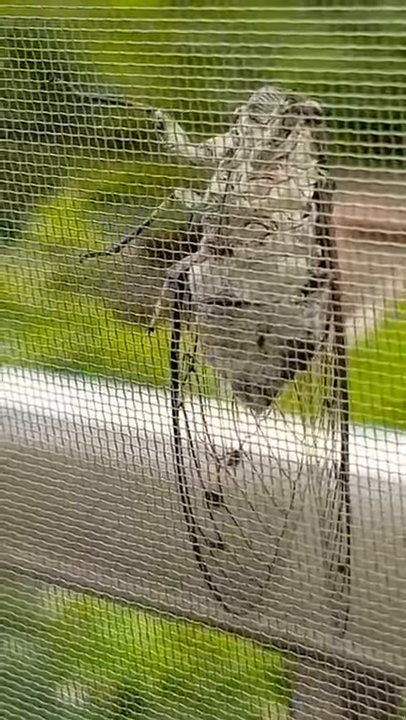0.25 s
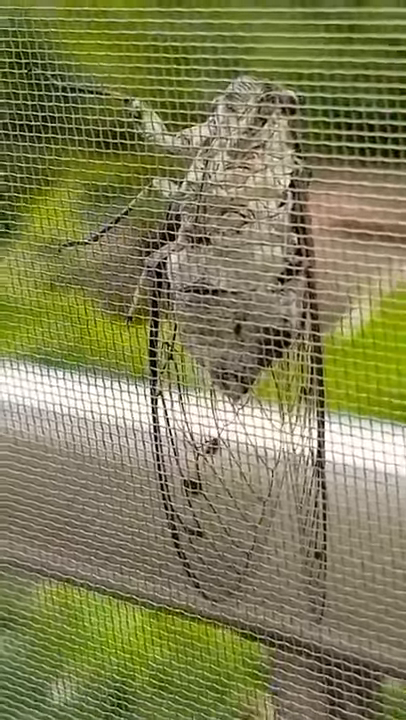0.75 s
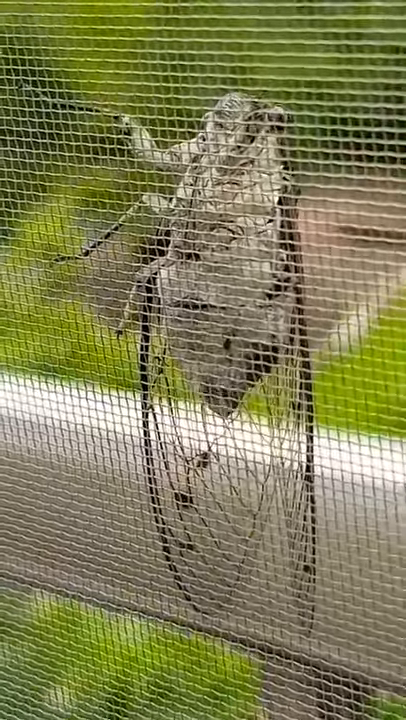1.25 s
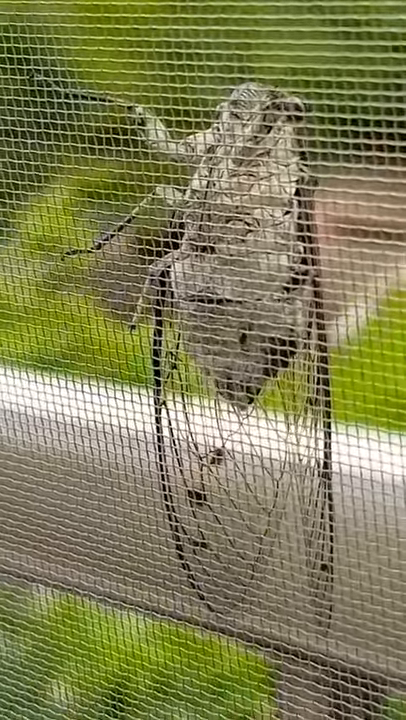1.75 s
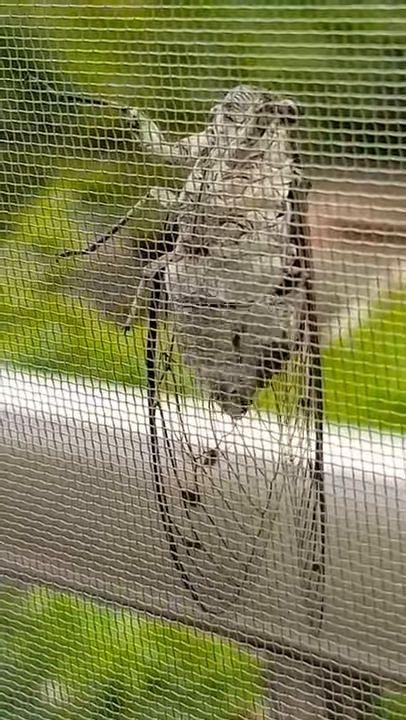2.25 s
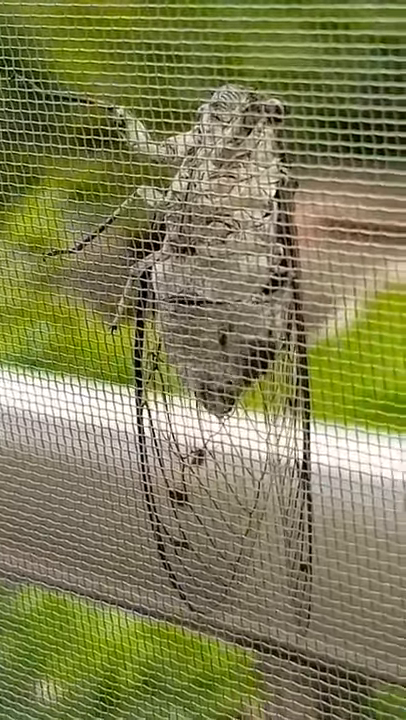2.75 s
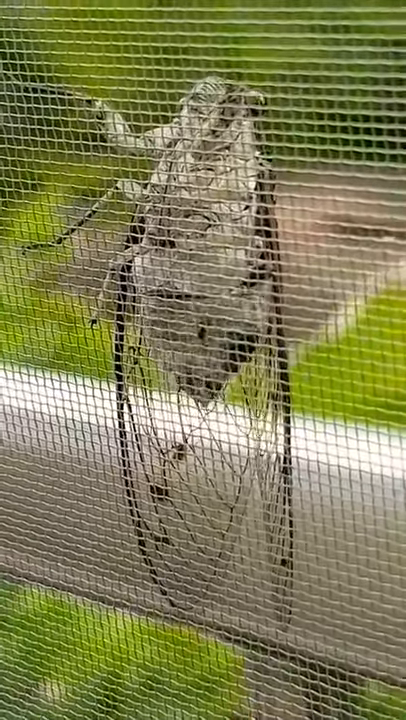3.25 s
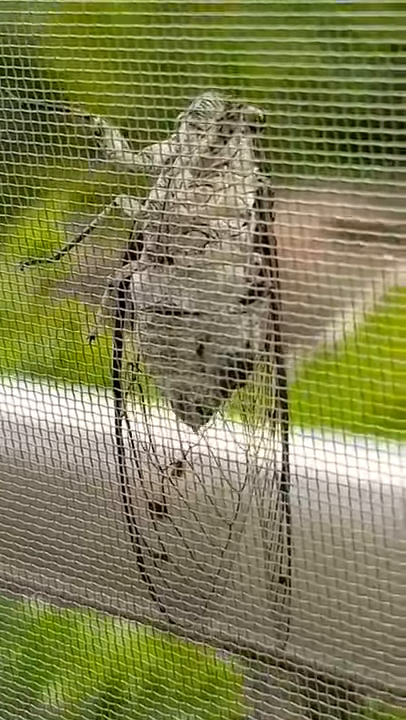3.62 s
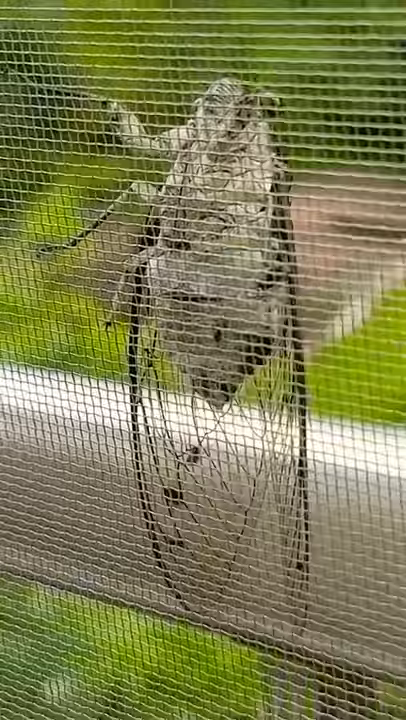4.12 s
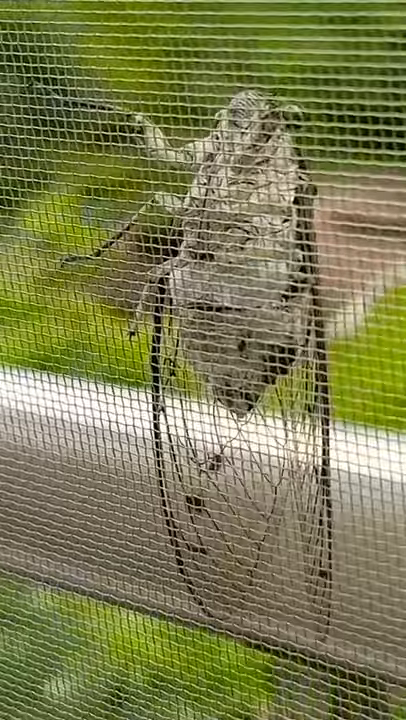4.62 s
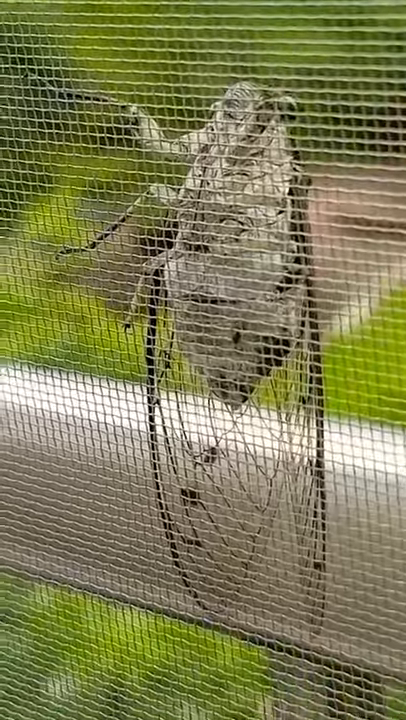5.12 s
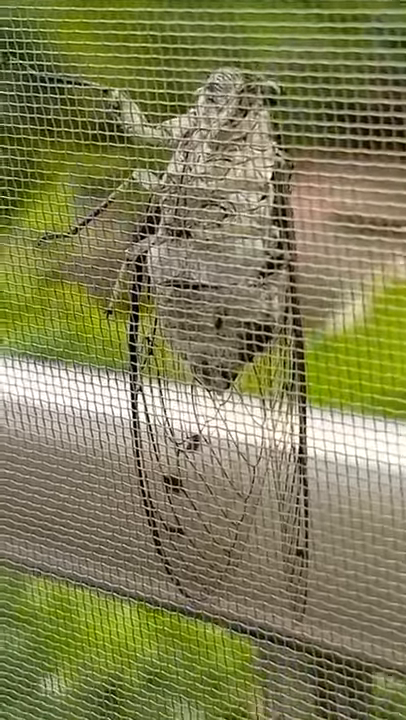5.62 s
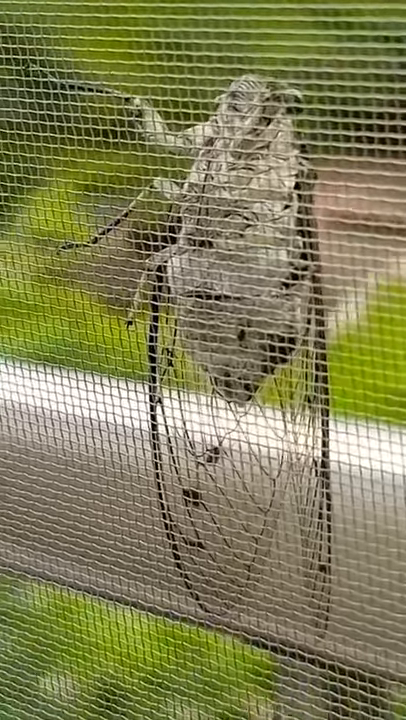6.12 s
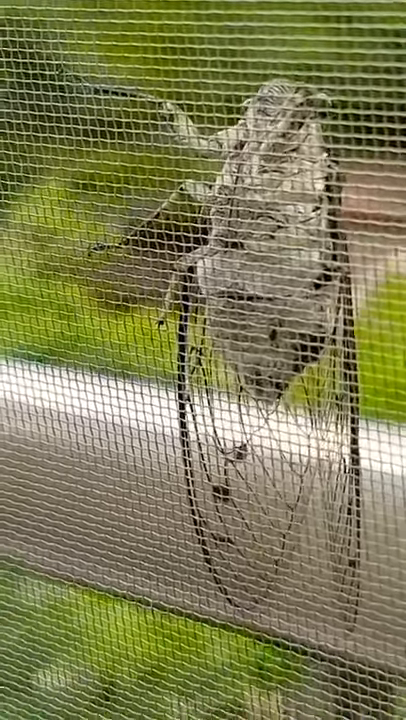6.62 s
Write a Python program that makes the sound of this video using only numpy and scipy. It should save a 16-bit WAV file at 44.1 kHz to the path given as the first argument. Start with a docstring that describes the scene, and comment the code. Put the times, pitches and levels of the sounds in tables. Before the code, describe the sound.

A cicada buzzes loudly up close outdoors, its song dipping to a high sizzle several times, then stops dead, leaving faint hiss and rumble.

```python
"""At a window screen, a cicada sings a hand's width from the microphone, then stops dead.
Its two tymbals (ribbed drum skins) buckle in turn and spring back: four clicks a cycle, which ring
in its body. Four times its abdomen (belly) slackens, the ring sinks, and the song thins to a high
sizzle, then snaps back. Brief pips flicker through the buzz. At last the beat runs down. Behind it
are an outdoor rumble, a far engine, the hiss of far insects and, near the end, three faint chirps."""
import sys
import numpy as np
from scipy import signal
from scipy.fft import rfft, irfft
from scipy.io import wavfile
from scipy.ndimage import uniform_filter1d

SR = 44100
rng = np.random.default_rng(int(sys.argv[2]) if len(sys.argv) > 2 else 0)


def int16_out(signal):
    """Quantize to a 16-bit WAV file."""
    q = np.round(np.clip(np.atleast_2d(signal).T, -1, 1) * 32767)
    wavfile.write(sys.argv[1], SR, q.astype(np.int16))


N = 302967

# One row for each pull of the abdomen: it snaps taut, eases its grip, then lets go.
# Columns: snap_s, ease_s, let_go_s, level_db, gripped_ring_hz, burst_db, burst_width_s
PHRASES = [(0.075, 0.258, 1.17, -24, 4730, -31, 0.038), (1.515, 1.84, 1.99, -25, 4660, -31.5, 0.023),
           (2.28, 2.504, 2.68, -24, 4630, -30.5, 0.027), (2.999, 3.237, 3.345, -23.5, 4640, -28.5, 0.02),
           (3.675, 3.92, 5.1, -24.5, 4650, -31.5, 0.028)]
# How hard the tymbals' ribs are driven. Columns: time_s, level_db
EFFORT = [(0, -5), (.3, -6), (1.3, -2), (3.1, 0), (5.0, -0.5)]

STOP_S = 5.031  # the song ends
PULL_S, SLACKEN_S, SIZZLE_ON_S = 0.05, 0.26, 0.045  # time to go taut, go slack, start sizzling
SLACK_HZ, HELD_HZ = 3650, 4420  # where the abdomen rings when slack and when held taut


def gain_of(db):
    """Turns decibels into a number to multiply by."""
    return 10 ** (np.asarray(db) / 20)


def evened(x):
    """Scales a signal to an average strength (rms) of 1."""
    return x / np.sqrt(np.mean(x ** 2) + 1e-20)


def ramp(x):
    """0 before, 1 after, a straight line between."""
    return np.clip(x, 0, 1)


def bump(t, width_s):
    """A smooth swell of height 1 around t = 0."""
    return np.exp(-.5 * (t / width_s) ** 2)


def read(points, hz):
    """Looks up a table by pitch, with every octave equally wide."""
    pitch_hz, value = np.transpose(points)
    return np.interp(np.log(hz + 1), np.log(pitch_hz + 1), value)


def follow(table, t):
    """Looks up every column of a table at the times t."""
    time_s, *columns = np.transpose(table)
    return [np.interp(t, time_s, column) for column in columns]


def causal(db):
    """The spectrum of the shortest ring that has these levels and starts only when struck."""
    cepstrum = irfft(db * np.log(10) / 20)
    half = cepstrum.shape[-1] // 2
    cepstrum[..., 1:half] *= 2
    cepstrum[..., half + 1:] = 0
    return np.exp(rfft(cepstrum))


def colour(x, points, size=2048):
    """Makes each pitch louder or softer, as a table of pitch_hz, level_db says."""
    taps = irfft(causal(read(points, np.fft.rfftfreq(size, 1 / SR))))
    return signal.oaconvolve(x, taps)[:N]


def resonate(x, hz, width_hz, passes=1):
    """Makes x ring at a pitch that may move: shifts that pitch to zero, smooths, shifts back."""
    turn = np.exp(2j * np.pi * np.cumsum(np.full(N, hz)) / SR)
    fade = np.exp(-np.pi * width_hz / SR)
    for _ in range(passes):
        x = 2 * (turn * signal.lfilter([1 - fade], [1, -fade], x / turn + 1e-18)).real
    return x


def wander(fastest_hz, span=20):
    """A random drift of strength 1; its slowest wave is span times slower than its fastest."""
    t = np.linspace(0, N / SR, N // 64)
    rates_hz = np.geomspace(fastest_hz / span, fastest_hz, 24)
    drift = sum(np.sin(2 * np.pi * (hz * t + rng.random())) for hz in rates_hz)
    return np.interp(np.arange(N) / SR, t, evened(drift))


def outdoor_rumble(level_db=-43, swell_db=1.41):
    """Far rumble that swells gently; its bass is alike on the left and right."""
    # Tone of the rumble. Columns: pitch_hz, relative_db
    rumble_tone = [(15, -45), (25, -23), (48, -1.5), (129, -0.5), (193, -1), (331, -11), (378, -8),
                   (666, -13), (895, -12), (1170, -13), (2300, -28), (3530, -74), (4750, -65), (5580, -48),
                   (15500, -53)]
    # How alike the two sides are. Columns: pitch_hz, likeness (1 = same; below 0 counts as 0)
    likeness = [(60, 0.99), (130, 1), (290, 0.91), (640, 0.69), (1410, 0.18), (3100, -0.53), (6820, -0.082),
                (15000, 0.31)]
    hz = np.fft.rfftfreq(N, 1 / SR)
    left, other = rfft(rng.standard_normal((2, N)))
    shared = np.sqrt(np.clip(read(likeness, hz), 0, 1))
    right = shared * left + np.sqrt(1 - shared ** 2) * other
    rumble = irfft(np.array([left, right]) * gain_of(read(rumble_tone, hz)), N)
    return evened(rumble) * gain_of(level_db + swell_db * wander(11))


def far_insects(level_db=-55, swell_db=1.41):
    """A chorus of far insects blurs into a soft hiss."""
    # Tone of the chorus. Columns: pitch_hz, relative_db
    chorus_tone = [(2200, -7.5), (3000, -1), (3500, -2), (3880, 1.5), (4150, -4), (4550, 1.5),
                   (5300, -10.5), (7000, -14.5)]
    hiss = np.array([evened(colour(noise, chorus_tone)) for noise in rng.standard_normal((2, N))])
    return hiss * gain_of(level_db + swell_db * wander(5.2))


def engine(waver=0.014, flutter_db=3):
    """A few low tones sink in pitch as a far vehicle passes; the air makes them flutter."""
    # The engine going by. Columns: time_s, pitch_hz, level_db
    passing = [(0, 200.4, -64), (1.2, 191.3, -54.5), (2, 183.7, -56), (2.7, 178.4, -43), (3.3, 169.4, -50),
               (4, 163.3, -54.5), (5.5, 161, -57)]
    # Its tones. Columns: pitch_multiple, relative_db
    tones = [(1, 3.5), (1.17, -2), (1.48, -1), (2, -2)]
    pitch_hz, level_db = follow(passing, np.arange(N) / SR)
    cycles = np.cumsum(pitch_hz * (1 + waver * wander(20))) / SR
    hum = sum(gain_of(db + flutter_db * wander(14)) * np.sin(2 * np.pi * multiple * cycles)
              for multiple, db in tones)
    return gain_of(level_db) * evened(hum)


def tension(t, release_s=SLACKEN_S):
    """0 when the abdomen is slack, 1 when it is taut: a quick pull, a hold, a release."""
    return ramp(sum(ramp((t - snap) / PULL_S + .5) * (1 - ramp((t - let_go) / release_s))
                    for snap, _, let_go, *_ in PHRASES))


def grip(t, easing_s=.12):
    """1 from each snap until the abdomen eases its hardest pull, otherwise 0."""
    return sum(ramp((t - snap) / PULL_S + .5) * ramp((ease - t) / easing_s + .5)
               for snap, ease, *_ in PHRASES)


def near_snaps(t, width_s, early_s=0):
    """A swell at every snap of the abdomen, or early_s ahead of it."""
    return sum(bump(t - snap + early_s, width_s) for snap, *_ in PHRASES)


def shiver():
    """The abdomen's uneven trembling, 6 to 24 times a second."""
    return wander(24, span=4)


def phrase(t, slack_drop_db=7, surge_db=2):
    """The voice's level and the pitch the abdomen rings at: both rise as it tightens."""
    rows = np.array(PHRASES)
    current = np.maximum(np.searchsorted(rows[:, 0] - PULL_S, t) - 1, 0)
    _, _, _, phrase_db, gripped_hz, _, _ = rows[current].T
    taut = tension(t)
    level_db = phrase_db - slack_drop_db * (1 - taut) + surge_db * near_snaps(t, width_s=0.024)
    ring_hz = SLACK_HZ + taut * (HELD_HZ - SLACK_HZ) + grip(t) * (gripped_hz - HELD_HZ)
    return level_db, ring_hz


def clicks(waver=0.004, uneven_db=0.4, second_db=1.0, jitter_s=48e-6, spring_jitter_s=16e-6):
    """Muscles buckle the tymbals in turn. Gives each click's time, size and back (1 = springs back)."""
    # Pace of the muscles. Columns: time_s, cycles_per_s
    pace = [(0.0, 124.0), (0.4, 117.8), (1.15, 129.5), (1.28, 123.2), (1.6, 129.2), (1.97, 123.2),
            (2.04, 120.2), (2.62, 129.8), (2.76, 119.0), (3.05, 129.8), (3.38, 125.8), (3.47, 114.2),
            (4.2, 113.8), (4.45, 106.8), (4.68, 87.8), (4.94, 84.0), (5.03, 78.2)]
    # Timing within a cycle. Columns: time_s, spring_back_s, second_tymbal_lag_cycles
    timing = [(1.3, .003, .515), (3.3, .00285, .52), (3.8, .00278, .565), (4.4, .00274, .565),
              (5, .00256, .54)]
    t = np.arange(N) / SR
    cycles = np.cumsum(follow(pace, t)[0] * (1 + waver * wander(30))) / SR
    cycle = np.arange(int(cycles[-1]))
    first_s = np.interp(cycle, cycles, t)
    spring_s, lag = follow(timing, first_s)
    second_s = np.interp(cycle + lag, cycles, t)
    click_s = np.stack([first_s, first_s + spring_s, second_s, second_s + spring_s], 1).ravel()
    stroke, back = np.divmod(np.arange(len(click_s)), 2)
    late, spring_late, strength = rng.standard_normal((len(click_s), 3)).T
    slip_s = jitter_s * (2 - tension(click_s)) * late[stroke]  # twice as uneven when slack
    click_s = abs(click_s + slip_s + spring_jitter_s * spring_late * back)
    size = gain_of(uneven_db * strength + second_db * (stroke % 2))
    sung = click_s < STOP_S
    return click_s[sung], size[sung], back[sung]


def tymbals(click_s, size, back, taut_back_db=-2, bright_db=4, vary_db=2.0, sharp=0.83, samples=512):
    """Each click is a short ring. Springing back is flipped, brighter and, when taut, weaker."""
    # Tone of one click. Columns: pitch_hz, relative_db
    click_tone = [(200, -46), (1400, -28.5), (1880, -14.5), (2060, -33.5), (2250, -8.5), (2500, -7.5),
                  (2850, 0), (3450, 1), (4000, -2), (4700, 1), (5600, -5.5), (6200, -4.5), (7500, 0),
                  (8600, -9), (14000, -13)]
    hz = np.fft.rfftfreq(samples, 1 / SR)
    back_db = taut_back_db * tension(click_s)[:, None] + bright_db * ramp(np.log2((hz + 1) / HELD_HZ))
    db = read(click_tone, hz) + abdomen(click_s, hz) + back[:, None] * back_db
    db += vary_db * evened(uniform_filter1d(rng.standard_normal(db.shape), size=9, axis=1))
    # The ribs give way one after another, which softens the start a little.
    spectra = causal(sharp * db) * gain_of((1 - sharp) * db)
    whole, fraction = np.divmod(click_s * SR, 1)
    lead = samples // 2
    delay = np.exp(-2j * np.pi * hz / SR * (fraction[:, None] + lead))
    rings = (size * (1 - 2 * back))[:, None] * irfft(spectra * delay)
    places = whole.astype(int)[:, None] + np.arange(samples)
    return np.bincount(places.ravel(), rings.ravel(), N + lead)[lead:]


def abdomen(click_s, hz, width_hz=300, warble_hz=70, throb_db=1.7, calm=.4):
    """The trembling abdomen boosts each click near its own pitch and cuts what lies above, in dB."""
    taut, firm = tension(click_s), grip(click_s)
    tremble = calm * taut + (1 - calm) * firm  # calmer once the grip eases
    warble, throb = (tremble * shiver()[(click_s * SR).astype(int)] for _ in range(2))
    centre_hz = phrase(click_s)[1] + warble_hz * warble
    offset_hz = hz - centre_hz[:, None]
    boost_db = 4 + 2 * taut + 2 * firm + throb_db * throb
    cut_db = 11 + 4 * taut
    hump = 1 / (1 + (offset_hz / width_hz) ** 2)
    above = .5 + .5 * np.tanh((offset_hz - 260) / 180)
    return hump * boost_db[:, None] - above * cut_db[:, None]


def body(x, sway, taut_db=-4.32, slack_change_db=-8, sway_hz=22):
    """The body rings on from click to click, less when slack; its pitches waver as it sways."""
    # The body's narrow rings. Columns: pitch_hz, width_hz, relative_db, last_phrase_change_db
    rings = [(2280, 90, 2, 3), (2840, 100, 3, -6), (3080, 90, 9.5, 1), (3400, 120, -8, 1),
             (3800, 250, -10, 3), (4430, 220, -13, 3)]
    t = np.arange(N) / SR
    drive = x * gain_of(taut_db + slack_change_db * (1 - tension(t)))
    last_phrase = ramp((t - PHRASES[-1][0]) / PULL_S)
    return x + sum(gain_of(db + change_db * last_phrase) * resonate(drive, hz + sway_hz * sway, width)
                   for hz, width, db, change_db in rings)


def voice(click_s, size, back, sway, trim_db=-1, taut_trim_db=-2):
    """The cicada's main voice: tymbal clicks ringing in the body."""
    t = np.arange(N) / SR
    buzz = body(tymbals(click_s, size, back), sway) * gain_of(taut_trim_db * tension(t))
    return evened(buzz) * gain_of(phrase(t)[0] + trim_db)


def ribs(click_s, size, decay_s, steady, rise_s=0.0012):
    """The ribs crackle at each click, over steady rubbing; left and right get their own noise."""
    kicks = np.bincount((click_s * SR).astype(int), size, N)
    t = np.arange(-500, 501) / SR
    swell = np.exp(np.minimum(t / rise_s, -t / decay_s))
    bursts = evened(signal.oaconvolve(kicks, swell, "same"))
    rubbing = steady * (np.arange(N) / SR < STOP_S)
    return (bursts + rubbing) * rng.standard_normal((2, N))


def rasp(click_s, size, back, base_db=-32.25, slack_db=1.25, grip_db=-2, buckle_db=-5):
    """A broad crackle of the ribs, mostly on springing back, with a harsh burst at each snap."""
    # Tone of the rasp. Columns: pitch_hz, relative_db
    rasp_tone = [(1500, -22.5), (2500, 7.5), (5000, -4), (6500, 3), (7500, -1.5), (8800, -1.5),
                 (10300, 3.5), (11200, 2.5), (12000, -7), (13800, -5), (15800, 0.5)]
    # Tone of the burst. Columns: pitch_hz, relative_db
    burst_tone = [(1200, -17), (1900, -4), (2600, 10.5), (3500, 5), (5300, -2.5), (6600, 7.5), (7600, -19),
                  (11000, 3), (15000, -5)]
    t = np.arange(N) / SR
    crackle = ribs(click_s, size * gain_of(buckle_db * (1 - back)), decay_s=0.00086, steady=0.31)
    burst = sum(gain_of(db) * bump(t - snap, width_s) for snap, *_, db, width_s in PHRASES)
    level = gain_of(base_db + follow(EFFORT, t)[0] + slack_db * (1 - tension(t)) + grip_db * grip(t))
    return np.array([level * evened(colour(side, rasp_tone)) + burst * evened(colour(side, burst_tone))
                     for side in crackle])


def sizzle(click_s, size, back, slack_hz=13250, taut_hz=13600, sag_hz=700, flutter_db=1.0):
    """The ribs' own high ring, set off by buckling; it is lower when slack and sags at each snap."""
    # Tone of the crackle that feeds the ring. Columns: pitch_hz, relative_db
    sizzle_tone = [(6000, -7), (10000, -14), (11700, -4.5), (12500, 0), (13300, -2), (14500, 1),
                   (15800, -5)]
    t = np.arange(N) / SR
    buckle_over_back_db = 47 - 5.5 * tension(click_s)
    size = size * gain_of(buckle_over_back_db * (0.5 - back))
    crackle = [colour(side, sizzle_tone) for side in ribs(click_s, size, decay_s=0.001, steady=0.31)]
    pitch_hz = slack_hz + (taut_hz - slack_hz) * tension(t) ** 2 - sag_hz * near_snaps(t, width_s=.03)
    ring = resonate(np.array(crackle), pitch_hz, width_hz=1400)
    return evened(ring) * gain_of(sizzle_level(t) + flutter_db * shiver())


def sizzle_level(t, let_go_db=-31.5, slack_db=1.5, early_s=.015):
    """The sizzle is faint while the abdomen holds, jumps as it lets go and peaks just before a snap."""
    # The sizzle while the abdomen is held. Columns: time_s, level_db
    held_sizzle = [(.2, -42), (.4, -38), (1.05, -41.5), (1.7, -43), (2.4, -40.5), (4, -40.5), (5, -41)]
    held = np.minimum(tension(t, SIZZLE_ON_S), np.maximum(tension(t + early_s, SIZZLE_ON_S), grip(t)))
    swell_db = 1.5 * near_snaps(t, width_s=.07, early_s=.07)
    surge_db = 3.5 * near_snaps(t, width_s=0.027, early_s=0.0061)
    loose_db = let_go_db + follow(EFFORT, t)[0] + swell_db
    level_db = held * follow(held_sizzle, t)[0] + (1 - held) * loose_db
    return level_db + slack_db * (1 - tension(t)) + surge_db


def upper_rings(click_s, size, lower_hz=4880, top_hz=5420, base_db=-36, hz_per_db=24, slack_db=-9):
    """Two high, fuzzy rings of the taut abdomen; the top one rises in pitch as it swells."""
    # The top ring when taut. Columns: time_s, level_db
    top_ring = [(.3, -45), (.55, -37.5), (.78, -40.5), (1.08, -36.5), (1.6, -41), (1.72, -43), (1.9, -39.5),
                (2.3, -35), (2.62, -39.5), (3.05, -34.5), (3.3, -36), (3.8, -36), (4.1, -35), (5, -36)]
    t = np.arange(N) / SR
    lower_db = base_db + .5 * follow(EFFORT, t)[0]
    top_db = follow(top_ring, t)[0]
    rings = 0
    for hz, db in ((lower_hz, lower_db), (top_hz + hz_per_db * (top_db - base_db), top_db)):
        crackle = ribs(click_s, size, decay_s=0.0019, steady=0.11)
        rings += evened(resonate(crackle, hz, width_hz=760, passes=3)) * gain_of(db)
    return rings * gain_of(slack_db * (1 - tension(t)))


def window_echoes(x, wall_fade_s=0.11, frame_fade_s=.01, frame_db=6, samples=5000):
    """Quick echoes bounce off the screen and frame, followed by a short tail from the wall."""
    t = np.arange(samples) / SR
    decay = gain_of(-60 * t / wall_fade_s) + gain_of(frame_db - 60 * t / frame_fade_s)
    echoes = rng.standard_normal(samples) * decay * (t > .0007)
    return signal.oaconvolve(x, echoes / np.linalg.norm(echoes))[:N]


def zips(click_s, size, middle_hz=3300, octaves_per_s=14):
    """As the abdomen snaps taut, a crackling ring shoots up in pitch."""
    t = np.arange(N) / SR
    crackle = ribs(click_s, size, decay_s=0.00092, steady=.1)
    snap_s = np.transpose(PHRASES)[0]
    nearest = np.searchsorted((snap_s[1:] + snap_s[:-1]) / 2, t)
    pitch_hz = middle_hz * 2 ** np.clip(octaves_per_s * (t - snap_s[nearest]), -1, 1)
    ring = evened(resonate(crackle, pitch_hz, width_hz=1300, passes=2))
    return ring * sum(gain_of(db) * bump(t - snap, width_s=.017) for snap, *_, db, _ in PHRASES)


def creak(click_s, size, back, pitch_hz=10950, base_db=-47, strain_db=7, early_s=0.025):
    """The taut ribs also ring below the sizzle; this swells just before the abdomen lets go."""
    t = np.arange(N) / SR
    crackle = ribs(click_s, size * back, decay_s=0.00034, steady=0.22)
    ring = evened(resonate(crackle, pitch_hz, width_hz=1000, passes=2))
    strain = sum(bump(t - let_go + early_s, width_s=0.054) for _, _, let_go, *_ in PHRASES[:-1])
    return ring * tension(t, SIZZLE_ON_S) * gain_of(base_db + follow(EFFORT, t)[0] + strain_db * strain)


def pips(click_s, size, trim_db=-8, rise_s=0.009):
    """Brief pips near 4.5 kHz, alike on left and right, flicker through the buzz."""
    # One row a pip. Columns: start_s, relative_db, pitch_hz
    pip_list = [(0.0832, -29, 4550), (0.156, -26, 4480), (0.1744, -24, 4600), (0.2992, -25.5, 4500),
                (1.5318, -26, 4900), (1.5994, -27, 4800), (1.6357, -23, 4570), (1.6955, -30, 4400),
                (1.7404, -29, 5000), (1.7891, -30, 4730), (2.2877, -19, 4400), (2.3451, -23, 4730),
                (2.4084, -24, 4510), (2.4797, -28, 4670), (3.038, -24, 4460), (3.0694, -21, 4360),
                (3.1358, -26, 4240), (3.1732, -20, 4730), (3.2101, -20.5, 4670), (3.3194, -25, 4520),
                (3.6855, -17.5, 4250), (3.7374, -24, 4450), (3.8072, -24, 4250), (3.8494, -22, 4820),
                (4.0262, -23.5, 4550), (4.1984, -23, 4300), (4.3794, -23.5, 4350), (4.4806, -22, 4500),
                (4.7212, -22, 4700), (4.7521, -25, 4210), (4.8883, -24.5, 4278)]
    t = np.arange(N) / SR
    start_s, _, pitch_hz = np.transpose(pip_list)
    nearest = np.searchsorted((start_s[1:] + start_s[:-1]) / 2 + rise_s, t)
    kicks = np.bincount((click_s * SR).astype(int), size, N)
    ring = resonate(kicks, pitch_hz[nearest], width_hz=340, passes=2)
    ring /= np.sqrt(abs(uniform_filter1d(ring ** 2, size=900)) + 1e-12)  # hold its level steady
    return ring * sum(gain_of(db + trim_db) * bump(t - start - rise_s, width_s=0.01)
                      for start, db, _ in pip_list)


def chirps(width_hz=140):
    """Faint, far chirps, blurred into narrow bands of noise."""
    # One row a chirp. Columns: peak_s, pitch_hz, level_db, width_s
    calls = [(5.554, 3850, -61, .03), (5.784, 3880, -61, .025), (6.248, 3500, -62, 0.072)]
    t = np.arange(N) / SR
    sound = 0
    for peak_s, pitch_hz, level_db, width_s in calls:
        band = evened(resonate(rng.standard_normal(N), pitch_hz, width_hz))
        sound += gain_of(level_db) * bump(t - peak_s, width_s) * band
    return sound


def scene(right_delay_s=0.00011, echo_db=-10.0, tremble_db=.5):
    """The voice reaches the right microphone later, shaded, and from another side of the insect."""
    # Extra wave shift on the right; it sets the buzz's stereo width. Columns: pitch_hz, phase_radians
    right_phase = [(2000, -0.18), (2600, 1), (3100, 0.15), (3500, -0.12), (4200, 0.012), (4600, -0.043),
                   (5800, 0.13), (6900, -0.77), (8000, -0.2)]
    # Tone of the right side compared with the left. Columns: pitch_hz, level_db
    right_tone = [(1900, 1), (2100, -1), (2270, -11), (2450, -5), (2750, -6), (3100, -2), (3450, 0),
                  (4400, 1), (4750, -1), (5100, 2), (5350, -4), (5900, -1), (8200, 0), (9050, -13),
                  (9900, -5), (11700, 0), (12300, -7), (13200, -11), (14500, -7), (15500, -11)]
    click_s, size, back = clicks()
    sway = wander(12)
    left, right = (voice(click_s, size, back, sway) for _ in range(2))
    hz = np.fft.rfftfreq(N, 1 / SR)
    phase = read(right_phase, hz) - 2 * np.pi * hz * right_delay_s
    right = irfft(rfft(right) * np.exp(1j * phase), N)
    song = np.array([left, right]) + upper_rings(click_s, size) + zips(click_s, size)
    song += rasp(click_s, size, back) + sizzle(click_s, size, back) + creak(click_s, size, back)
    song *= gain_of(tremble_db * shiver())
    left, right = (side + gain_of(echo_db) * window_echoes(side) for side in song)
    foreground = np.array([left, colour(right, right_tone)]) + pips(click_s, size)
    return foreground + outdoor_rumble() + far_insects() + engine() + chirps()


def record(dry):
    """Cuts away the very highest treble."""
    top_hz = 15700
    taps = signal.firwin(511, top_hz, window=("kaiser", 9), fs=SR)
    return signal.oaconvolve(dry, taps[None], "same")


dry = scene()
out = record(dry)
int16_out(out)
```